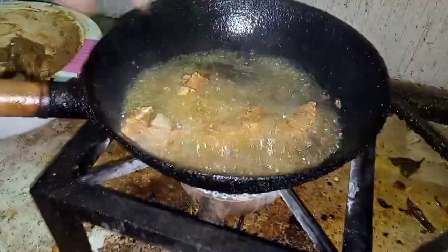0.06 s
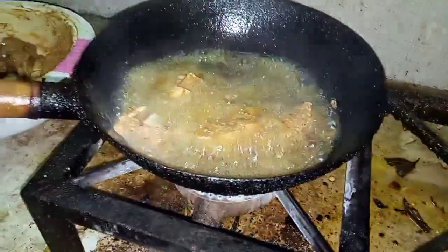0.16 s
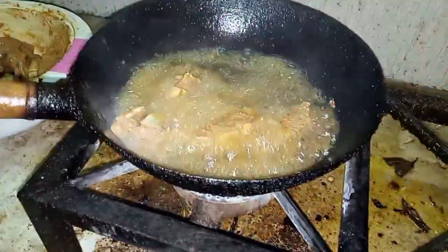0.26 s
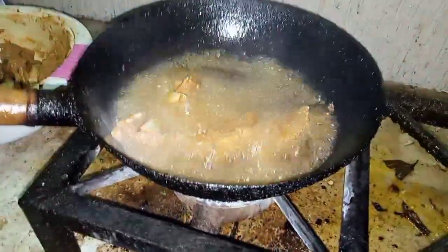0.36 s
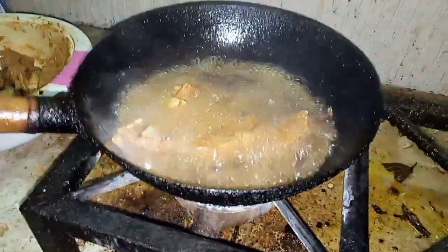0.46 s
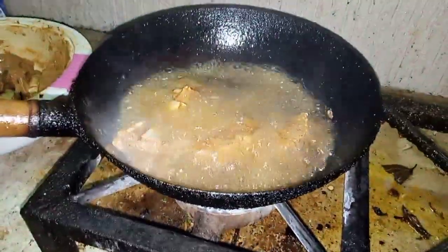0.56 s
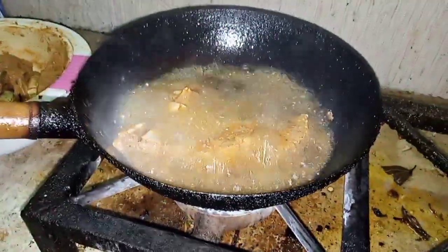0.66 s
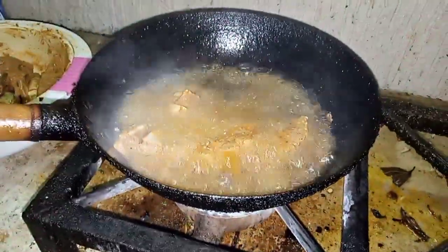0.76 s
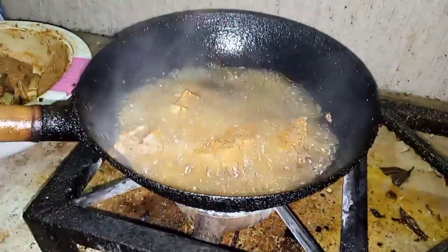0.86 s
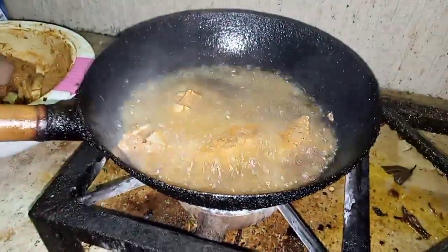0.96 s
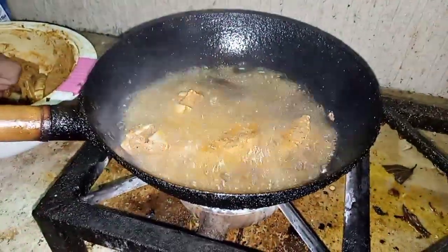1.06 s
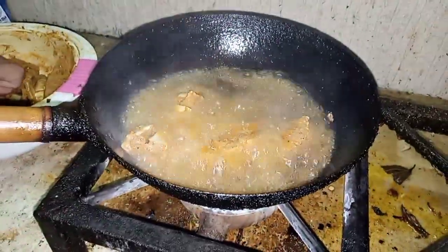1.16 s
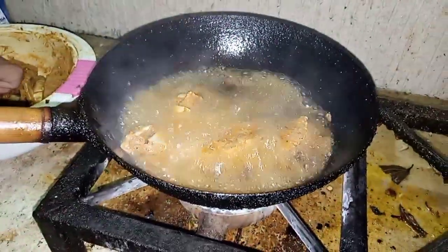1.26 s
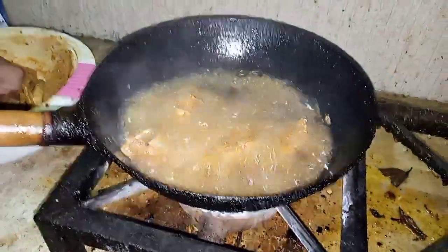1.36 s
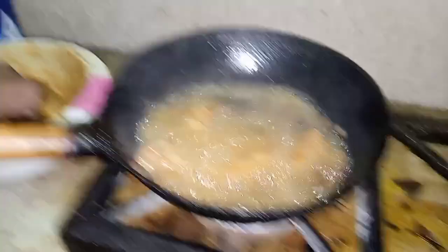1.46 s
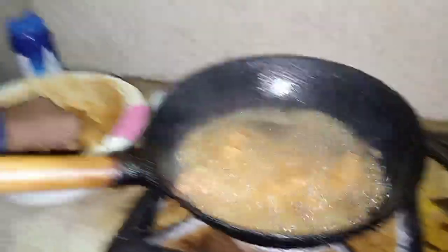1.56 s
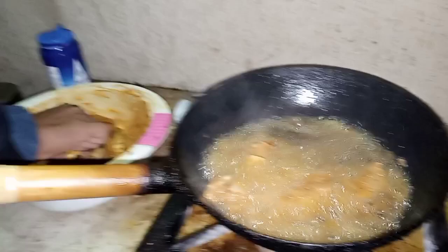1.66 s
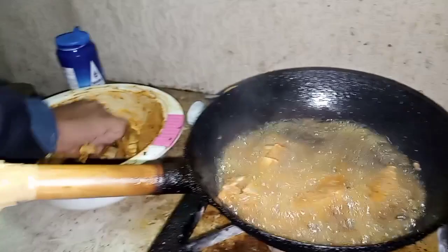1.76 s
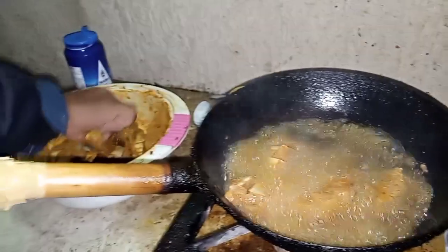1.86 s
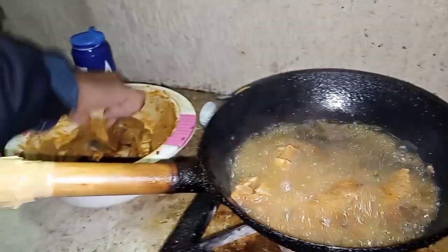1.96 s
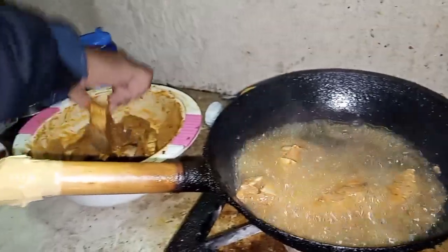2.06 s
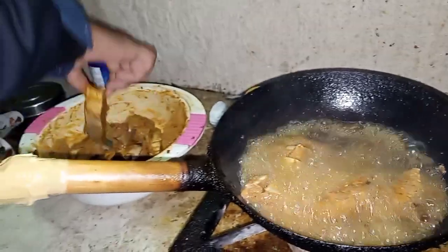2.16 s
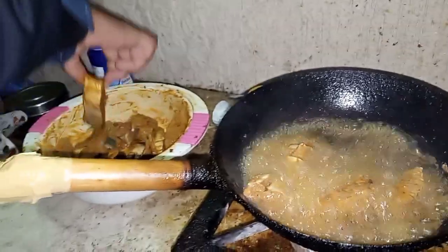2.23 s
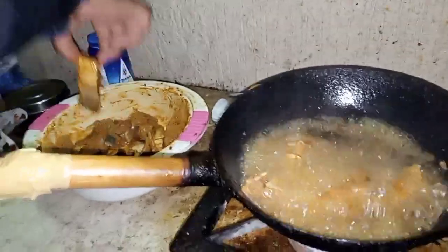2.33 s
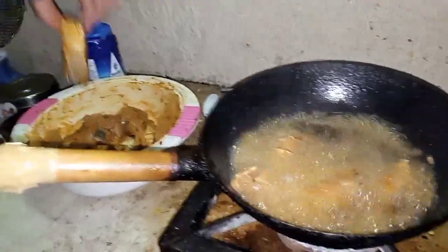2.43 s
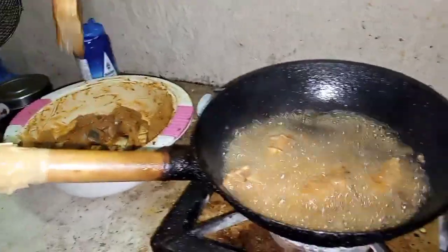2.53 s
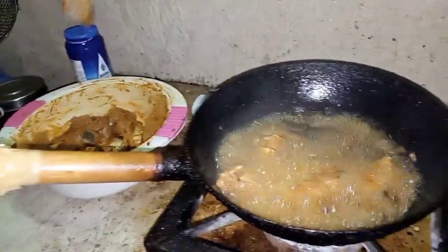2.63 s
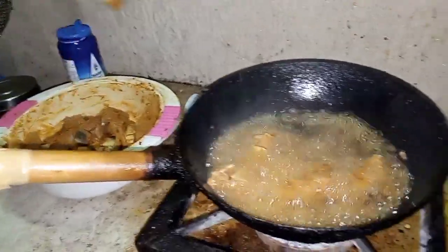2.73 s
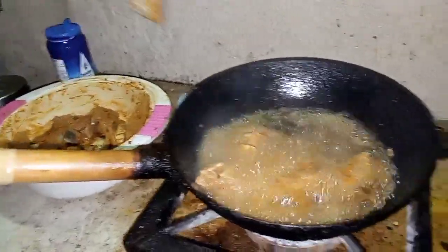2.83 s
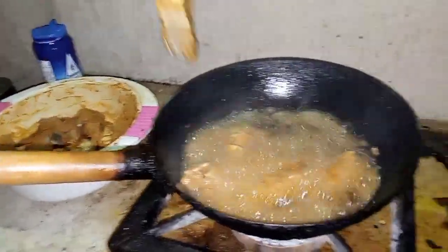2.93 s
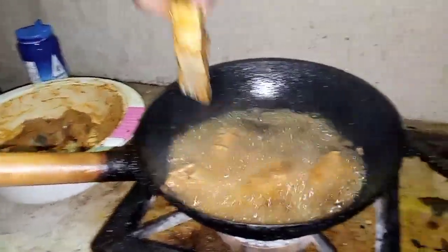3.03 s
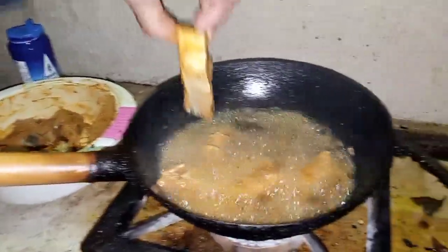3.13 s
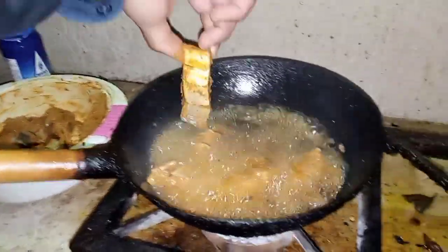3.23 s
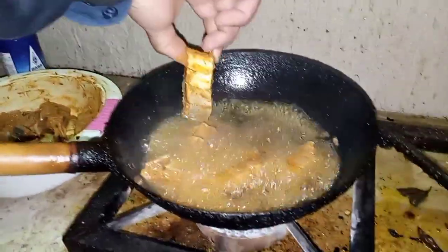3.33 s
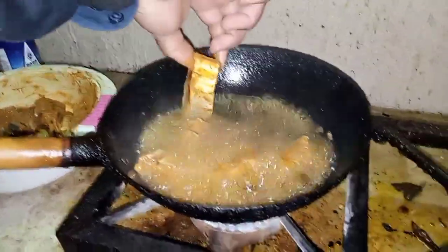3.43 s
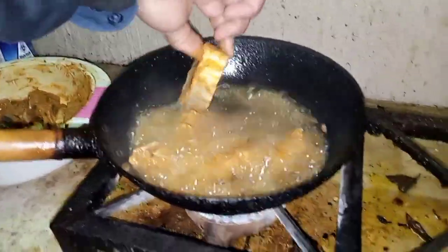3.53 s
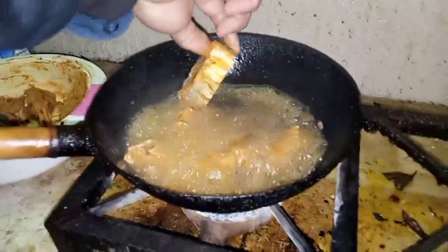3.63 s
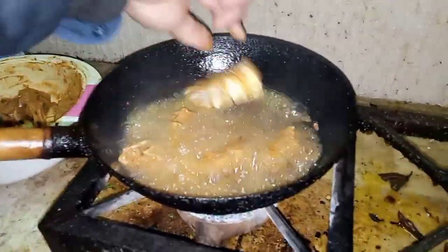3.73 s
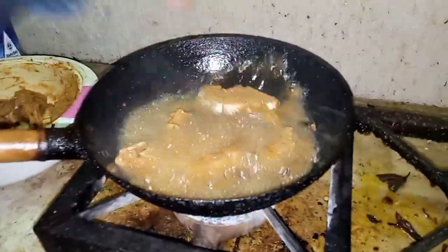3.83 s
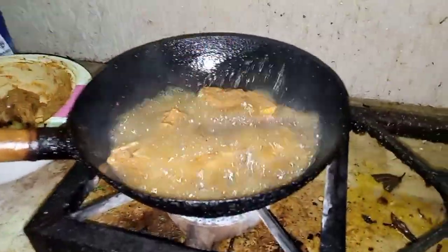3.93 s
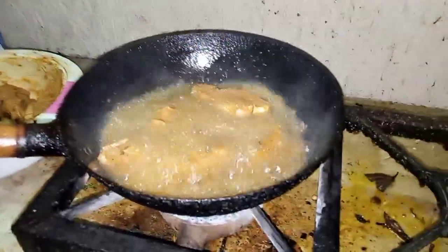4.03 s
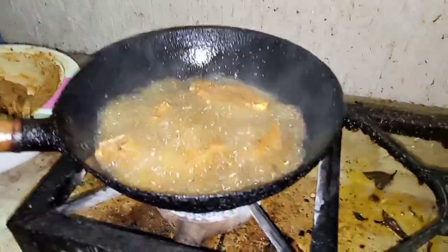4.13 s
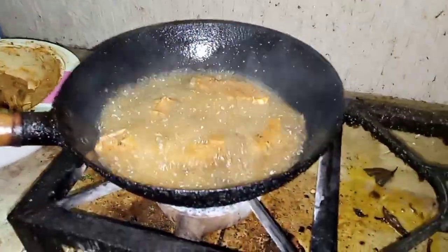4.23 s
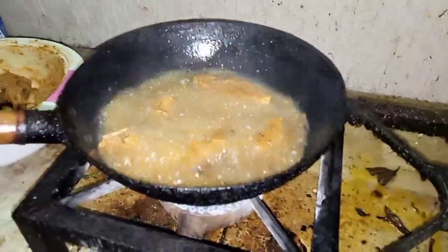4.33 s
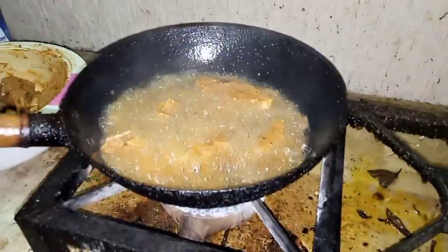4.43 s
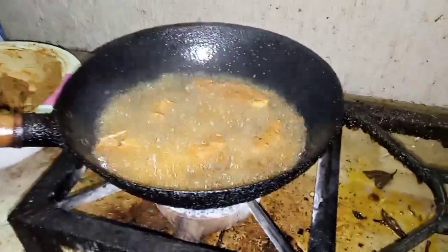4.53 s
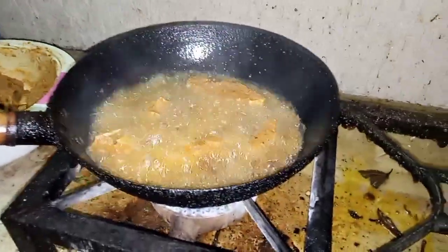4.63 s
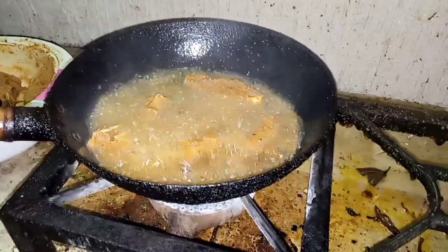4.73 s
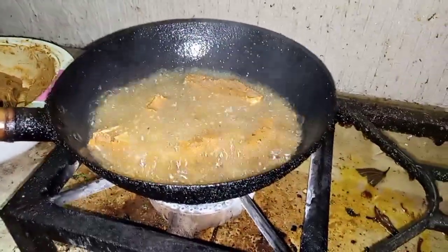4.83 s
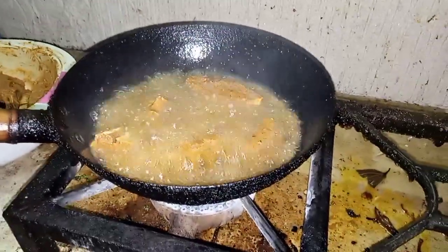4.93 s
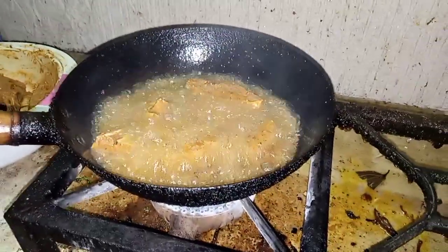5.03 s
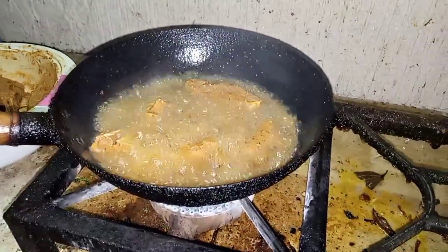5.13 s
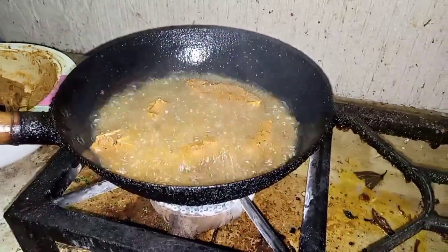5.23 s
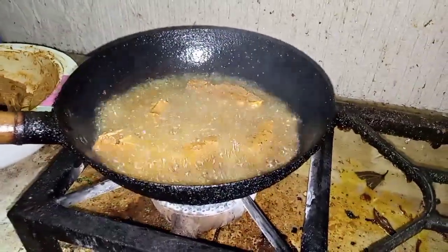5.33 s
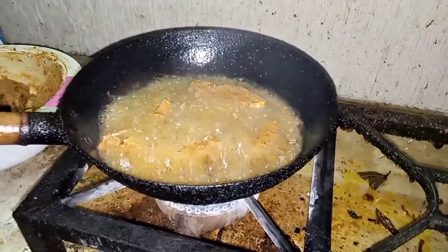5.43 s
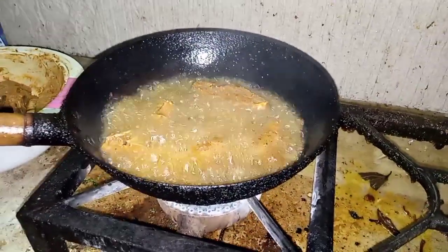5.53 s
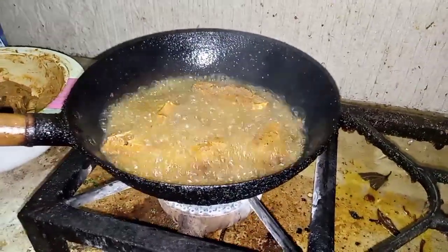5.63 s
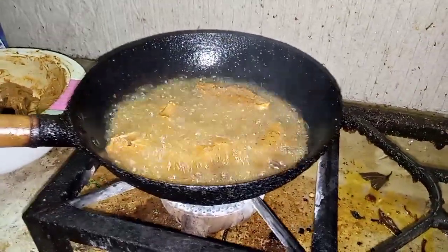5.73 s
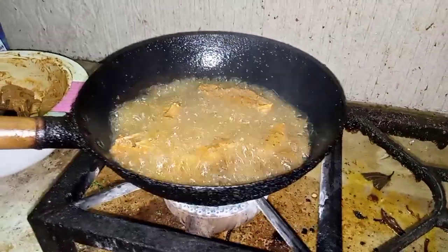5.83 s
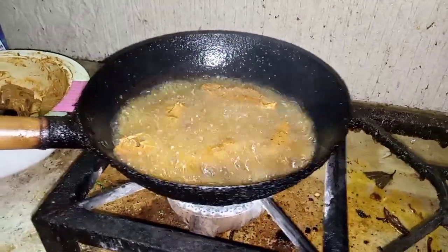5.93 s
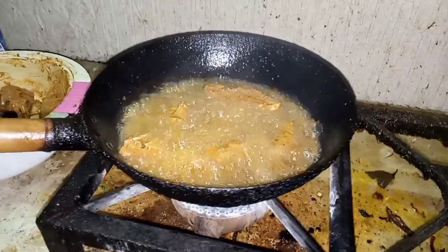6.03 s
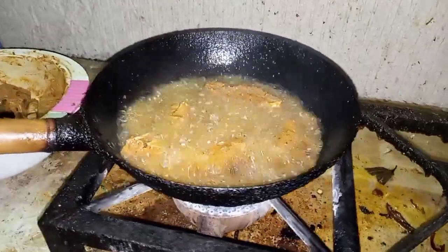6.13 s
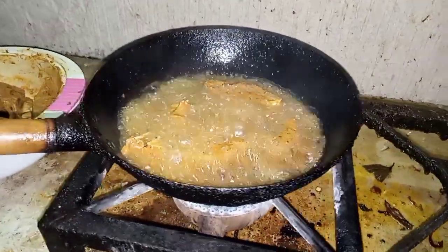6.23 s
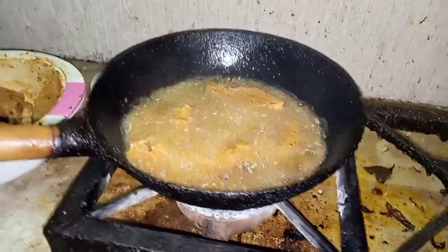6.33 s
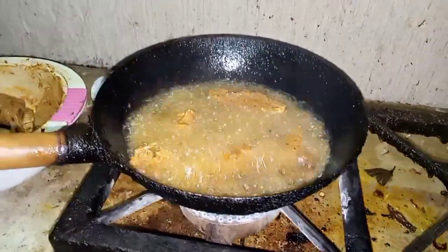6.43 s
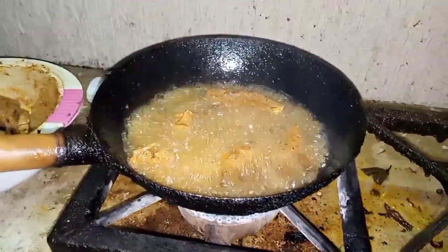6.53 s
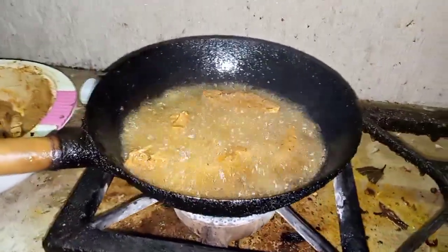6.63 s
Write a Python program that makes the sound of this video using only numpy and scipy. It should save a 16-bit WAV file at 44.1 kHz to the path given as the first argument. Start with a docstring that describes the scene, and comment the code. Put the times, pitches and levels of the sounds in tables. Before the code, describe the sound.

Fish deep-fries in a wok of hot oil, heard close up in a small kitchen with very little echo. It opens with a bright, fluttering hiss of steam over a dense sizzle of tiny bursting bubbles. Sharp single spits cut through, the strongest at about 1.1 seconds, and a few bubbles give brief squeaks as the sizzle gradually ebbs. A soft knock comes near 1.4 seconds. At about 3.3 seconds another wet piece goes in: the oil gurgles, spits more often and swells to a louder sizzle. At about 4.1 seconds trapped water bursts in one big pop with a short splutter and a slight ring of the wok. Fine spray fizzes on top from 4.5 seconds. Several dull knocks land nearby between 3.7 and 5.5 seconds. The frying eases slightly but continues until the end, near 6.7 seconds, with a faint gas flame rumble underneath throughout.

```python
"""Fish deep-fries in a wok on a gas burner, close up in a small kitchen.
It opens on a hiss of steam from wet batter, over countless bubbles bursting in the oil. Single spits cut
through and a few bubbles sing as the sizzle ebbs. After three seconds a fresh wet piece goes in: it
gurgles, lifts the sizzle and, near four seconds, lets off one big pop as trapped water flashes to steam.
Fine spray fizzes on top, a few dull knocks land nearby, and the oil eases off over a faint flame rumble."""
import sys
import numpy as np
from scipy import signal
from scipy.fft import rfft, irfft
from scipy.io import wavfile

SR = 44100
rng = np.random.default_rng(int(sys.argv[2]) if len(sys.argv) > 2 else 0)


def log_audio(samples):
    """Write samples as a 16-bit WAV file to the path given in sys.argv[1]."""
    # one column per channel
    frames = np.atleast_2d(samples).T
    # limit to full scale, then quantise
    limited = np.clip(frames, -1, 1)
    pcm = np.round(limited * 32767).astype(np.int16)
    wavfile.write(sys.argv[1], SR, pcm)


N = 294588
T = np.arange(N) / SR

# wet fish meeting the oil, and the surge it sets off: start_s, sizzle_db, gurgle_db, steam_jet_db
FISH_PIECES = [(-0.6, -46, -55, -36.5), (3.328, -29, -45.5, -52)]
# tone of the crackle: frequency_hz, gain_db
CRACKLE_EQ = [(400, -42.5), (700, -27), (1500, -19), (1850, -19), (2200, -18), (2650, -18.5), (3100, -3.5),
              (3550, 1), (4250, -2.5), (5000, -18.5), (5800, -22), (6600, -22.5), (8200, -41.5),
              (12000, -70)]
# tone of the tiny ringing bubbles: frequency_hz, gain_db
PING_EQ = [(1900, -24), (2300, -12), (2650, -10.5), (3010, -1), (3250, 1.5), (3620, 3.5), (4100, -1),
           (4480, 1.5), (5050, -10), (5400, -14), (6500, -25), (7400, -23), (8500, -61), (12000, -65)]
# the wok's high ring under the snapping bubbles: pitch_hz, level_db, t60_s
WOK_RIM_MODES = [(2316, -7.5, 0.3), (3045, 5.5, 0.089), (3540, 8, 0.081), (4424, 13.5, 0.032),
                 (5870, -13, 0.15), (6770, -17, 0.054)]
# the featured spits of oil: start_s, level_db, pitch_hz
LOUD_SPITS = [(0.0503, -18.5, 3740), (0.183, -20, 3670), (0.714, -22, 3500), (1.0152, -24, 3300),
              (1.113, -15, 3480), (1.7636, -24, 3920), (2.0524, -23.5, 3770), (3.0167, -25.5, 3100),
              (3.048, -19, 3380), (3.379, -21, 3520), (3.686, -19, 4120), (3.8596, -14, 3200),
              (4.029, -20, 3440), (4.145, -13, 3600), (4.3939, -15, 3450), (4.6179, -19, 3650),
              (4.779, -22, 3660), (6.635, -22, 3520)]
# steam pockets bursting under the oil: start_s, level_db, pitch_hz, bang_gain
STEAM_POCKETS = [(0.444, -46, 600, .4), (0.74, -50, 520, .2), (1.155, -49.5, 480, .2),
                 (4.1225, -20, 990, .85)]
# the wok of oil ringing around a pop: pitch_hz, level_db, t60_s
WOK_BODY_MODES = [(300, -7.5, 0.2), (349, -14, 0.37), (606, -1, 0.083), (680, -32, 0.042), (880, -24, 0.56),
                  (1100, -9, 0.4), (1184, 1, 0.15), (1220, -3, 0.38)]
# tone of the splutter after a 950 Hz pop, shifted with each pop's pitch: frequency_hz, gain_db
SPLUTTER_EQ = [(60, -25), (125, -1.5), (220, -15.5), (330, 1.5), (480, -3), (650, 7.5), (1200, 1),
               (1450, -1), (2200, -5), (4000, -38), (9000, -80)]
# tone of the large bubbles: frequency_hz, gain_db
GURGLE_EQ = [(250, -19.5), (520, -12), (600, -6), (690, -1.5), (950, -7), (1120, -0.5), (1300, 3.5),
             (1550, 6.5), (1800, 1), (2120, 11), (2600, 2.5), (4000, -47)]
# tone of the steam leaving the batter: frequency_hz, gain_db
STEAM_JET_EQ = [(1400, -44), (1850, -6), (2080, 3), (2600, -1), (3400, -11), (4600, 6), (5350, 1),
                (5800, -31), (6600, -8), (7300, -18.5), (9000, -26.5), (11000, -52)]
# tone of the finest droplets: frequency_hz, gain_db
SPRAY_EQ = [(5000, -45), (8000, -39), (12500, -35.5), (13800, -24), (14400, -8.5), (15000, -4.5),
            (15500, -3), (16500, -34.5)]
# fader ride on the spray: time_s, level_db
SPRAY_RIDE = [(0.0, -55), (0.11, -61), (0.76, -49), (1.11, -56), (3.09, -60.5), (3.29, -50.5), (3.55, -55),
              (3.63, -46.5), (4.0, -51), (4.39, -49), (4.5, -35.5), (4.52, -41.5), (5.1, -37), (6.68, -47)]
# the clearest singing bubbles: start_s, length_s, pitch_hz, level_db
CLEAR_SQUEALS = [(0.024, 0.098, 5410, -40.5), (0.102, 0.32, 6430, -56.5), (0.988, 0.079, 5400, -48),
                 (1.155, 0.059, 2120, -43.5), (1.424, 0.071, 705, -57), (1.43, 0.15, 6200, -55.5),
                 (1.79, 0.073, 2200, -48), (2.466, 0.057, 2160, -49), (2.75, 0.089, 1525, -52),
                 (3.014, 0.047, 2280, -45), (3.417, 0.15, 884, -52.5), (3.624, 0.17, 773, -47),
                 (3.712, 0.46, 1288, -46.5), (3.792, 0.065, 686, -46.5), (3.979, 0.1, 3000, -37),
                 (4.0, 0.14, 2115, -39), (4.415, 0.056, 1474, -43), (4.526, 0.18, 2300, -43.5),
                 (4.59, .1, 515, -55), (4.74, 0.063, 684, -50.5), (5.171, 0.18, 3030, -34)]
# dull knocks nearby: start_s, level_db, contact_s
KNOCK_HITS = [(1.166, -56.5, 0.0019), (1.375, -43, 0.0074), (3.735, -39, 0.0074), (4.235, -36, 0.0068),
              (4.519, -40, 0.0073), (5.147, -41, 0.00076), (5.168, -39, 0.0005), (5.422, -39, 0.0031),
              (5.4319, -29, 0.0038), (5.484, -36, 0.0046)]
# ring of the heavy thing being knocked: pitch_hz, level_db, t60_s
KNOCK_BODY_MODES = [(106.6, -10, 0.21), (159.3, -16, 0.49), (197.5, 4.5, 0.14), (215, 10, 0.077),
                    (313, -6.5, 0.24), (393, 3.5, 0.089), (490, -21, 0.2), (713, -5, 0.18)]
# tone of the flame and rolling oil: frequency_hz, gain_db
BURNER_EQ = [(20, 14.5), (35, 14), (50, 10), (80, 4), (110, -0.5), (160, -4), (300, -6), (550, -6.5),
             (1200, -22), (4000, -13)]


def sizzle(wet):
    """Tiny bubbles snap in flurries and the smallest merge into hiss; on wet fish many of them ring."""
    snaps = unit(bursts(count=16000, spread_db=2.5)) * undb(1.8 * wander(35))
    crackle = unit(eq(snaps + undb(-4) * rng.standard_normal(N), CRACKLE_EQ))
    pings = bubbles(count=4200, low_hz=1876, high_hz=8517, cycles=410, spread_db=3.5, glide=0.011)
    rim = unit(signal.fftconvolve(snaps, ring(WOK_RIM_MODES, rise_s=0.0027))[:N])
    ringing = unit(unit(eq(pings, PING_EQ)) + undb(-9.5) * rim)
    blend = np.sqrt(1 - wet) * crackle + np.sqrt(wet) * ringing
    return unit(kitchen(blend, wet_db=-16.5, t60_s=0.13))


def boil():
    """Envelopes for sizzle, gurgle, steam jet and wetness: each piece adds a surge to the simmer."""
    fine, large = undb(-38.5) ** 2, undb(-57.5) ** 2  # the simmer under the surges
    jet = wet = 0
    for start_s, sizzle_db, gurgle_db, jet_db in FISH_PIECES:
        heated_s = start_s + 0.25  # the sizzle waits for the batter to heat; large bubbles come at once
        fine += undb(sizzle_db) ** 2 * surge(heated_s, rise_s=.85, fall_db_per_s=2)
        large += undb(gurgle_db) ** 2 * surge(start_s, rise_s=.7, fall_db_per_s=3.5)
        jet += undb(jet_db) ** 2 * surge(start_s, rise_s=.1, fall_db_per_s=8)
        wet += 0.41 * surge(heated_s, rise_s=0.075, fall_db_per_s=1.5)  # share of the sizzle that rings
    return np.sqrt(fine), np.sqrt(large), np.sqrt(jet), np.clip(wet, 0, 1)


def flurries(wet):
    """Movement in the sizzle's gain: on wet fish it sways at random and each loud spit stirs it up."""
    stir = sum(arch(T - start_s + 0.0061, length_s=0.056) for start_s, _, _ in LOUD_SPITS)
    return undb(wet * (2.5 * stir - 0.5 * wander(9.2)))


def spits():
    """Each spit of oil is a snap a few cycles long, with a short spattering tail."""
    out = np.zeros(N)
    t = T[:SR // 200] - .001
    snap = np.exp(-(t / 0.0007) ** 2)
    for start_s, level_db, pitch_hz in list(LOUD_SPITS) + small_spits(count=22):
        add(out, start_s, undb(level_db) * snap * np.sin(2 * np.pi * pitch_hz * t))
    return kitchen(out, wet_db=-2.5, t60_s=0.1)


def small_spits(count):
    """A random scatter of lesser spits, as rows of start_s, level_db, pitch_hz."""
    when, size, pitch = rng.random((count, 3)).T
    level_db = -34 - 8.8 * np.log(1 - .9 * size)
    pitch_hz = 3720 * 2 ** (.4 * (pitch - .5))
    return list(zip(when * N / SR, level_db, pitch_hz))


def steam_pops():
    """Trapped water flashes to steam: a short bang, the wok's ring, then a splutter of oil."""
    out, t = np.zeros(N), T[:SR // 2]
    punch = 1.5 * np.sqrt(np.abs(arch(t, length_s=.004)))
    settling = fade(t, 0.24) + undb(-12.5) * fade(t, 0.25)
    wok = undb(-7.5) * ring(WOK_BODY_MODES, rise_s=0.01)
    for start_s, level_db, pitch_hz, bang_gain in STEAM_POCKETS:
        bang = bang_gain * punch * np.sin(2 * np.pi * pitch_hz * t)
        add(out, start_s, undb(level_db) * (bang + wok))
        splutter = np.zeros(N)
        add(splutter, start_s, undb(level_db + 2.5) * settling * rng.standard_normal(len(t)))
        out += eq(splutter, [(hz * pitch_hz / 950, db) for hz, db in SPLUTTER_EQ])  # low pops are darker
    return out


def gurgle():
    """Large bubbles roll up around the fish and plop open, coloured by the hollow of the wok."""
    plops = bubbles(count=1400, low_hz=457.4, high_hz=2513, cycles=87, spread_db=1.0, glide=0.028)
    clicks = unit(bursts(count=2700, spread_db=6.0))
    blend = unit(eq(plops, GURGLE_EQ)) + unit(eq(clicks, GURGLE_EQ))
    return unit(kitchen(blend, wet_db=-2, t60_s=0.29))


def steam_jet():
    """Steam escapes the wet batter in a bright, fluttering hiss."""
    fizz = unit(bursts(count=25000, spread_db=5.0))
    return unit(eq(fizz, STEAM_JET_EQ)) * undb(2.16 * wander(31.3))


def spray():
    """The finest droplets fizz in quick puffs, adding air at the very top."""
    mist = unit(bursts(count=30000, spread_db=4)) + undb(3) * rng.standard_normal(N)
    return unit(eq(mist, SPRAY_EQ) * undb(wander(28) + 1.6 * wander(160)))


def squeals(gurgling, wet_sizzling):
    """Steam forced through the batter makes single bubbles sing: short, rough, narrow tones."""
    out, t = np.zeros(N), T[:SR // 2]
    bins_hz = np.fft.rfftfreq(len(t), 1 / SR)
    coos = singing_bubbles(gurgling, low_hz=614, high_hz=2400, trim_db=-2.5, typical_s=.05, count=44)
    chirps = singing_bubbles(wet_sizzling, low_hz=4440, high_hz=7200, trim_db=-16, typical_s=.03, count=50)
    for start_s, length_s, pitch_hz, level_db in list(CLEAR_SQUEALS) + coos + chirps:
        width_hz = 30 + 0.012 * pitch_hz
        resonance = 1 / (1 + ((bins_hz - pitch_hz) / width_hz) ** 2)
        swell = arch(t, length_s + 0.012)
        tone = swell * irfft(rfft(rng.standard_normal(len(t))) * resonance, len(t))
        tone_rms = np.sqrt(np.sum(tone ** 2) / np.sum(swell ** 2))
        add(out, start_s - .01, undb(level_db) * tone / tone_rms)
    return out


def singing_bubbles(drive, low_hz, high_hz, trim_db, typical_s, count):
    """Squeals come thicker and louder with the drive: rows of start_s, length_s, pitch_hz, level_db."""
    when, life, pitch = rng.random((count, 3)).T
    onsets = np.searchsorted(np.cumsum(drive) / drive.sum(), when)
    pitch_hz = low_hz * (high_hz / low_hz) ** pitch
    level_db = 20 * np.log10(drive[onsets]) + trim_db
    return list(zip(onsets / SR, typical_s * (.5 + life), pitch_hz, level_db))


def knocks():
    """Soft blows on something heavy; the longer the contact, the darker the thud."""
    out, t = np.zeros(N), T[:SR // 50]
    body = ring(KNOCK_BODY_MODES, rise_s=.008)
    for start_s, level_db, contact_s in KNOCK_HITS:
        push = arch(t, contact_s)
        add(out, start_s, undb(level_db) * signal.fftconvolve(body, push / push.sum()))
    return kitchen(out, wet_db=-5, t60_s=0.38)


def burner(sizzling):
    """A faint, unsteady bed of flame and rolling oil that grows with the boil."""
    rumble = unit(eq(rng.standard_normal(N), BURNER_EQ))
    boil_db = 20 * np.log10(sizzling) + 32.5
    return rumble * undb(-61 + 0.64 * boil_db + 2 * wander(3.3))


def kitchen(x, wet_db, t60_s):
    """A tight reverb: scatter from the bowl of the wok and the close walls."""
    t = T[:SR // 3]
    tail = rng.standard_normal(len(t)) * fade(t, t60_s) * (t > .002)
    return x + undb(wet_db) * signal.fftconvolve(x, tail / np.linalg.norm(tail))[:N]


def bubbles(count, low_hz, high_hz, cycles, spread_db, glide):
    """Bubbles ring at a pitch set by their size and bend up a little as they surface."""
    out = np.zeros(N)
    for when, pitch, strength, life in rng.random((count, 4)):
        hz = low_hz * (high_hz / low_hz) ** pitch
        t = T[:int(cycles * (.5 + life) / hz * SR) + 2]
        age = t / t[-1]
        gain = undb(-spread_db * np.log(1 - .97 * strength))
        tone = np.sin(2 * np.pi * hz * t * (1 + glide * age / 2))
        add(out, when * N / SR, gain * fade(age, 1) * tone)
    return unit(out)


def bursts(count, spread_db):
    """Clicks at random moments: many small ones, few large."""
    when, size, sign = rng.random((count, 3)).T
    rarity = -np.log(1 - .985 * size)
    return np.bincount((when * N).astype(int), undb(spread_db * rarity) * np.sign(sign - .5), N)


def ring(modes, rise_s):
    """Half a second of modes that bloom over the rise time, then die away."""
    t = T[:SR // 2]
    swell = 1 - np.exp(-(t / rise_s) ** 2)
    return swell * sum(undb(db) * fade(t, t60_s) * np.sin(2 * np.pi * hz * t) for hz, db, t60_s in modes)


def surge(start_s, rise_s, fall_db_per_s):
    """Power that climbs evenly to 1, then ebbs."""
    age = T - start_s
    return np.clip(age / rise_s, 0, 1) * undb(-fall_db_per_s * np.maximum(age - rise_s, 0)) ** 2


def arch(t, length_s):
    """A half-sine envelope."""
    return np.sin(np.pi * np.clip(t / length_s, 0, 1))


def fade(t, t60):
    """Exponential decay, 60 dB down at t60."""
    return np.exp(-np.log(1000) * t / t60)


def wander(rate_hz):
    """Smooth random modulation at rms 1."""
    knots = rng.standard_normal(4096)
    return unit(np.interp(T * rate_hz, np.arange(len(knots)), knots))


def eq(x, curve):
    """Shape the tone with a curve of frequency_hz, gain_db points."""
    hz, db = np.transpose(curve)
    bins_hz = np.maximum(np.fft.rfftfreq(len(x), 1 / SR), 1)
    return irfft(rfft(x) * undb(np.interp(np.log(bins_hz), np.log(hz), db)), len(x))


def add(out, start_s, sound):
    """Drop a sound onto the track."""
    i = max(int(start_s * SR), 0)
    out[i:i + len(sound)] += sound[:max(N - i, 0)]


def undb(db):
    """Decibels to gain."""
    return 10 ** (np.asarray(db) / 20)


def unit(x):
    """Scale to rms 1."""
    return x / np.sqrt(np.mean(x ** 2))


def scene():
    """The mono mix: the frying bed, its accents, the knocks and the burner."""
    sizzling, gurgling, steaming, wet = boil()
    spraying = undb(np.interp(T, *np.transpose(SPRAY_RIDE)))
    oil = sizzle(wet) * sizzling * flurries(wet) + gurgle() * gurgling
    hiss = spray() * spraying + steam_jet() * steaming
    accents = squeals(gurgling, sizzling * np.sqrt(wet)) + spits() + steam_pops()
    return (oil + hiss + accents + knocks() + burner(sizzling))[None]


def record(dry):
    """A small microphone loses the deep bass, and a steep high cut trims the very top."""
    low_cut = signal.butter(4, 96.5, "high", fs=SR, output="sos")
    high_cut = signal.ellip(12, .1, 85, 15550, fs=SR, output="sos")
    return signal.sosfilt(high_cut, signal.sosfilt(low_cut, dry))


dry = scene()
out = record(dry)
log_audio(out)
```